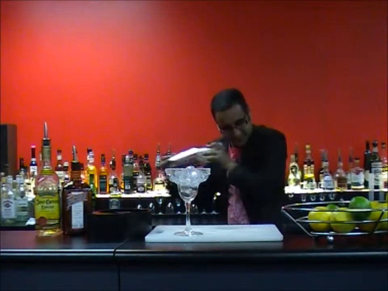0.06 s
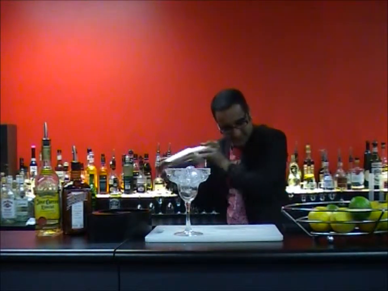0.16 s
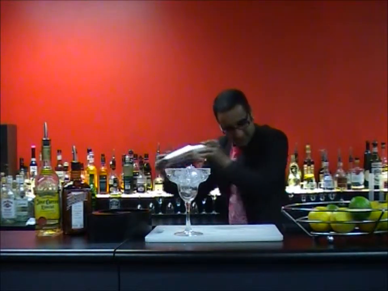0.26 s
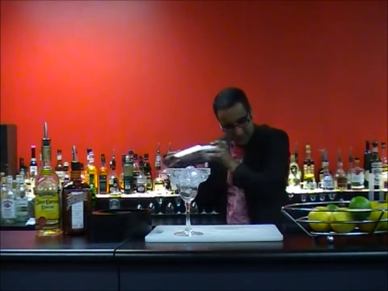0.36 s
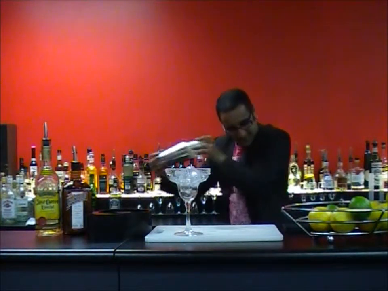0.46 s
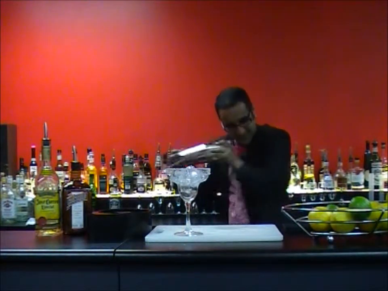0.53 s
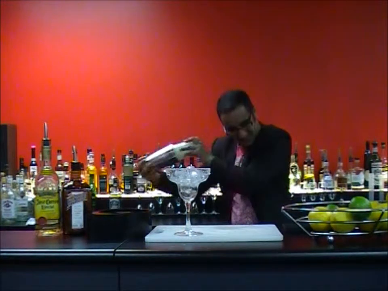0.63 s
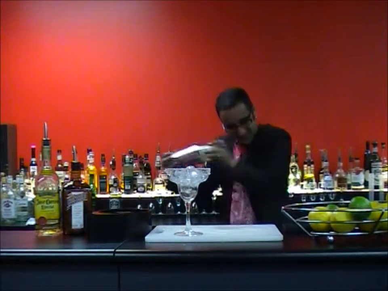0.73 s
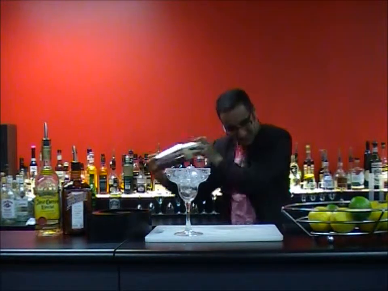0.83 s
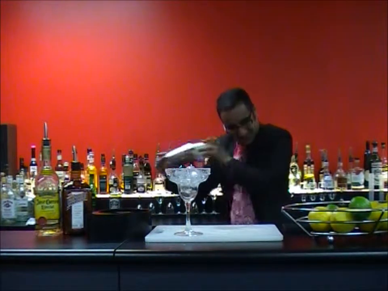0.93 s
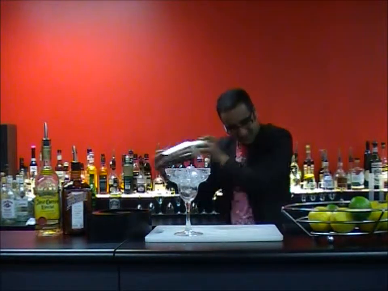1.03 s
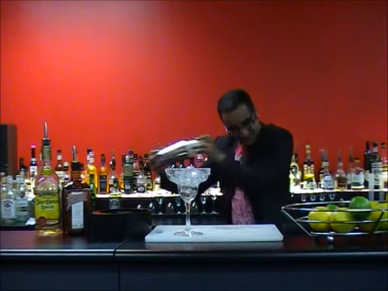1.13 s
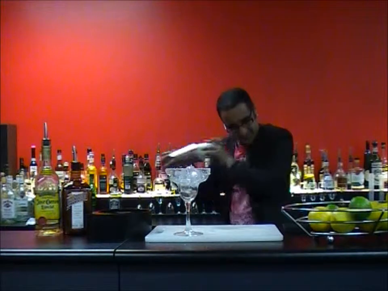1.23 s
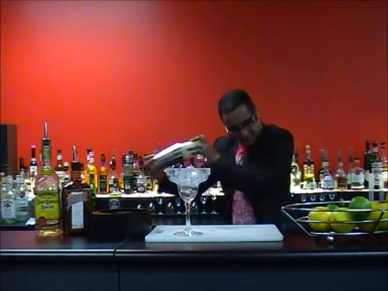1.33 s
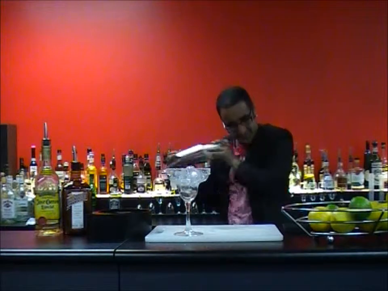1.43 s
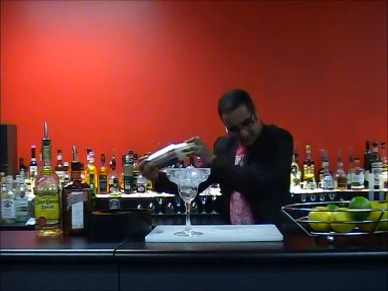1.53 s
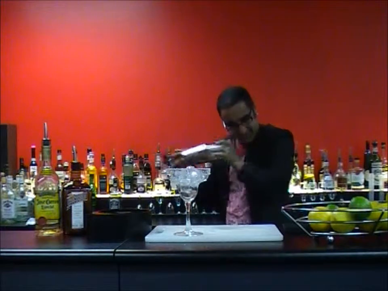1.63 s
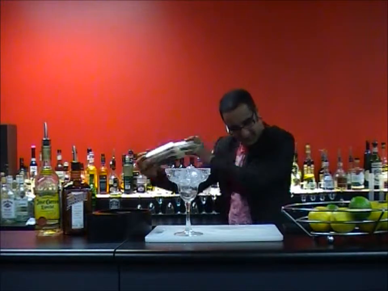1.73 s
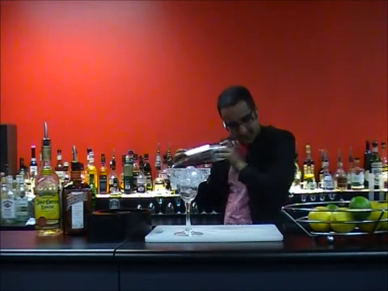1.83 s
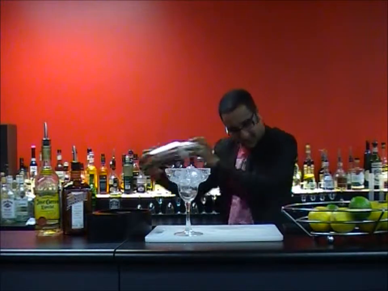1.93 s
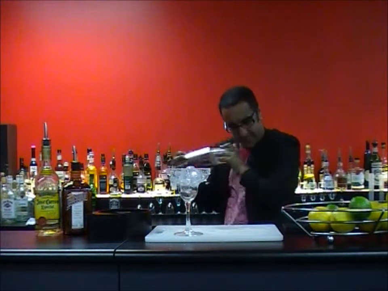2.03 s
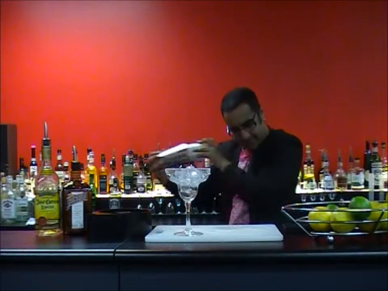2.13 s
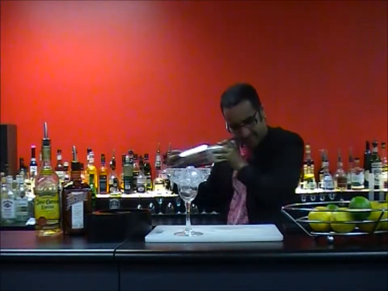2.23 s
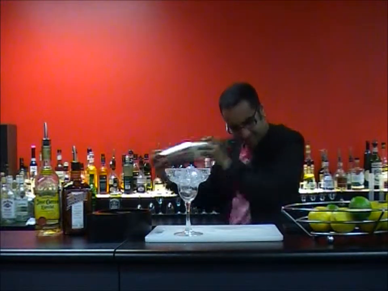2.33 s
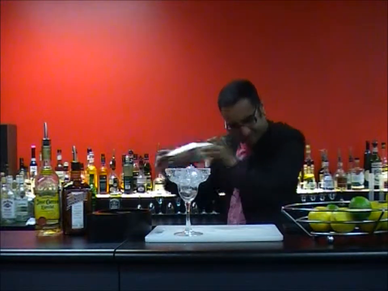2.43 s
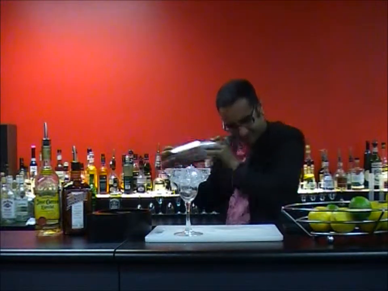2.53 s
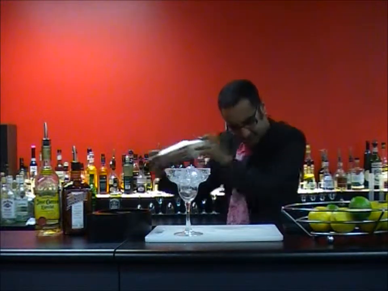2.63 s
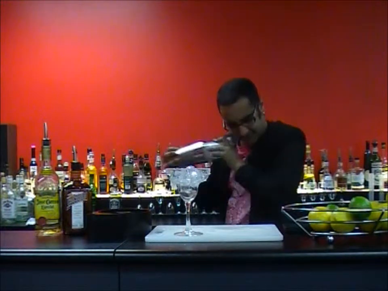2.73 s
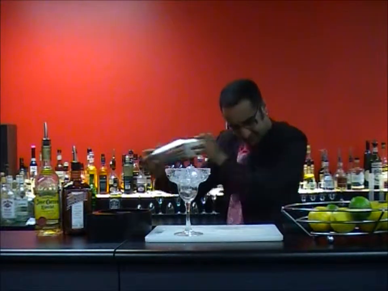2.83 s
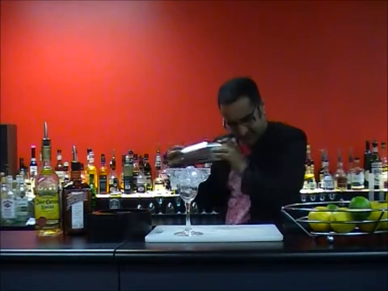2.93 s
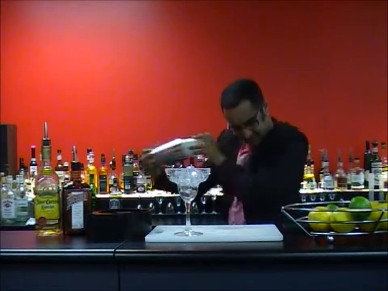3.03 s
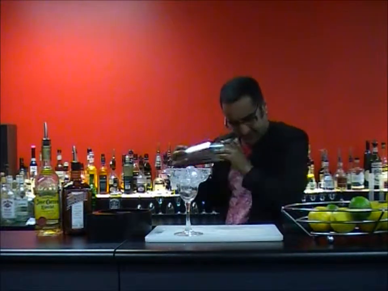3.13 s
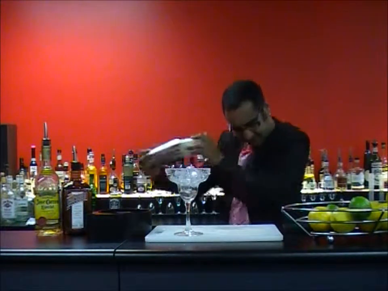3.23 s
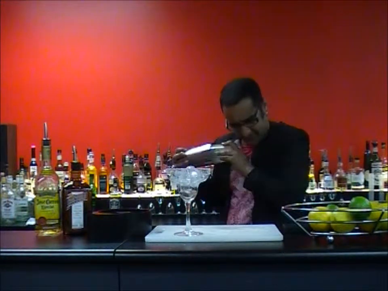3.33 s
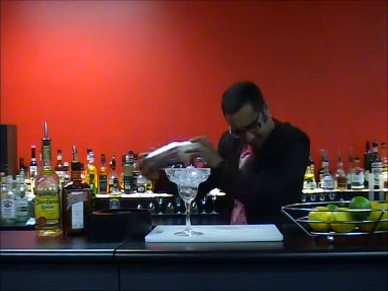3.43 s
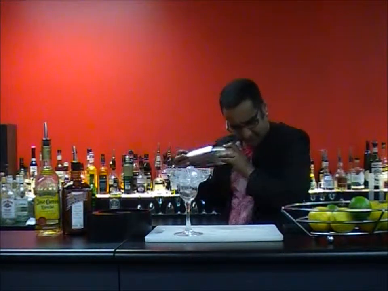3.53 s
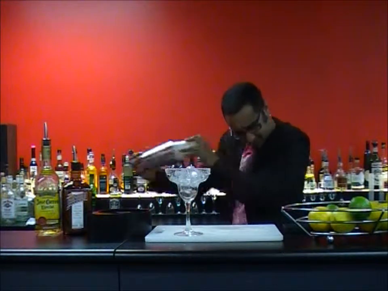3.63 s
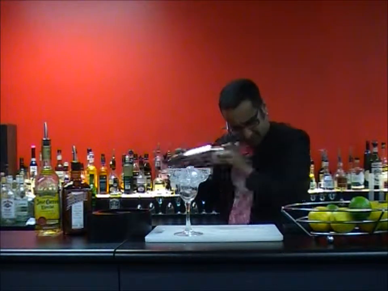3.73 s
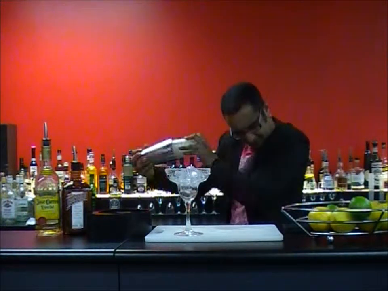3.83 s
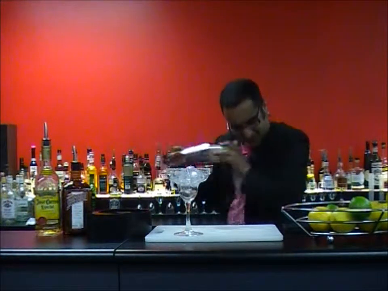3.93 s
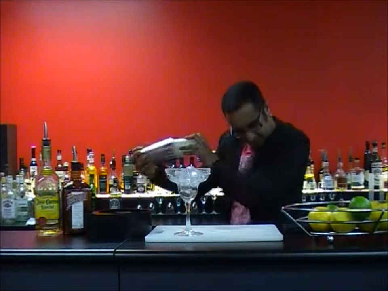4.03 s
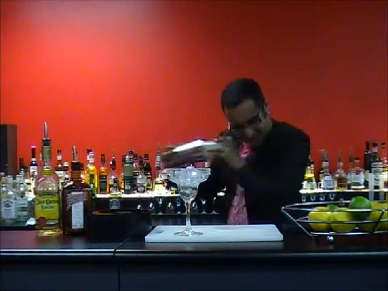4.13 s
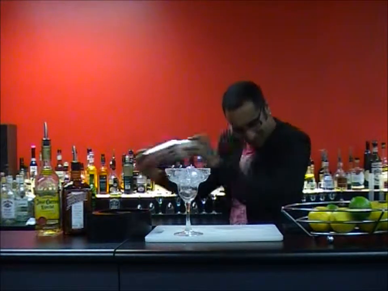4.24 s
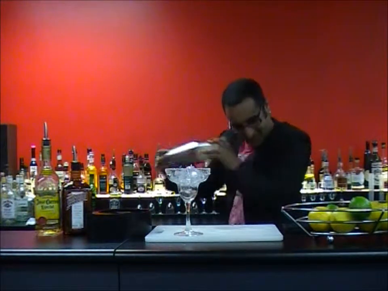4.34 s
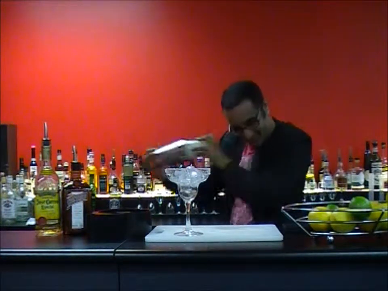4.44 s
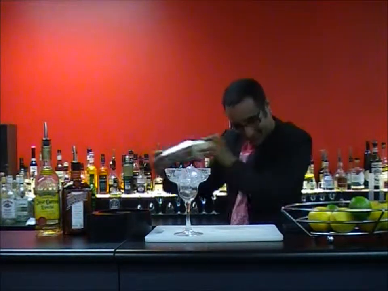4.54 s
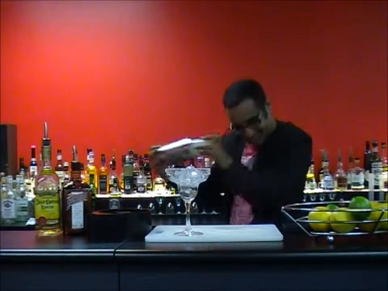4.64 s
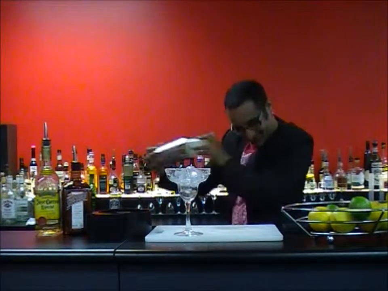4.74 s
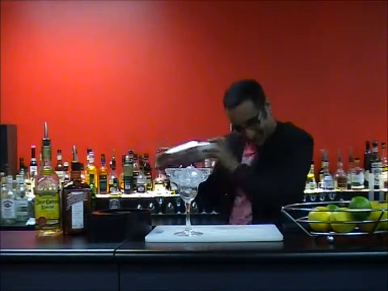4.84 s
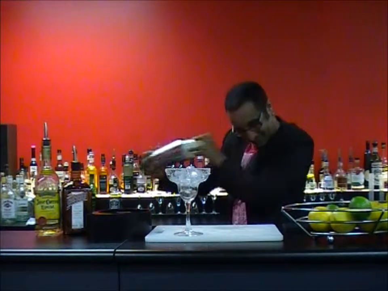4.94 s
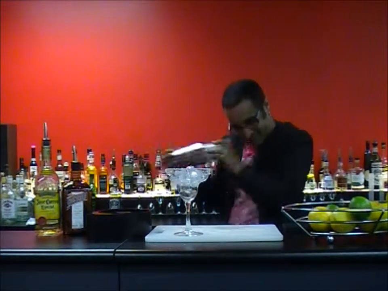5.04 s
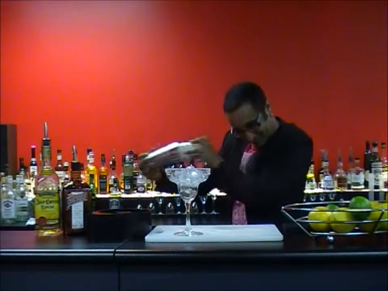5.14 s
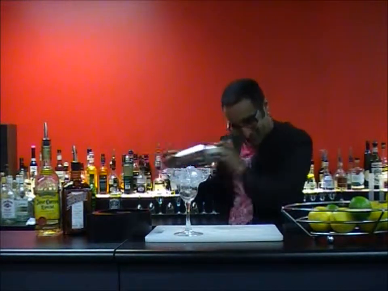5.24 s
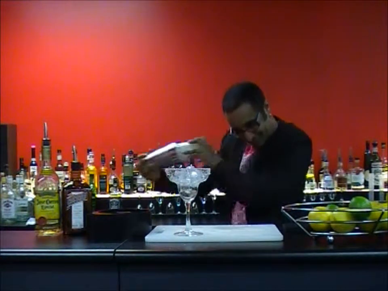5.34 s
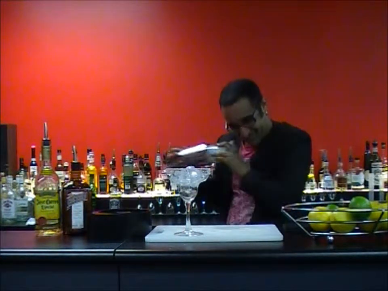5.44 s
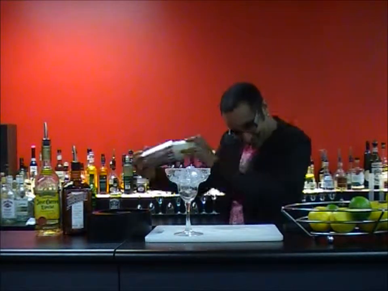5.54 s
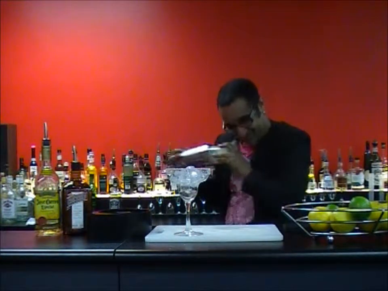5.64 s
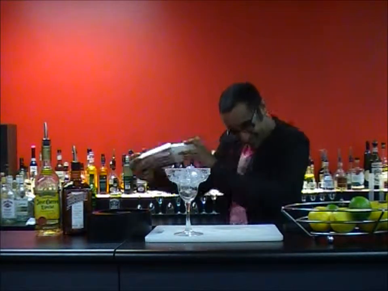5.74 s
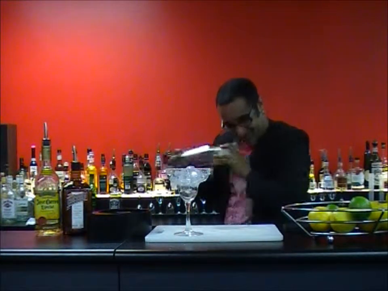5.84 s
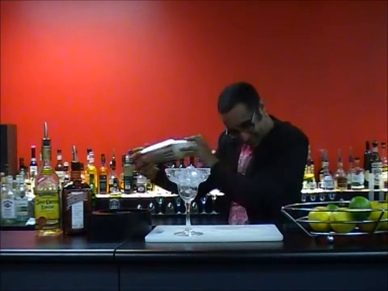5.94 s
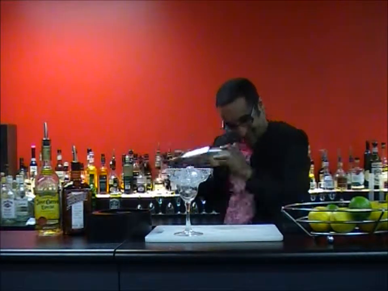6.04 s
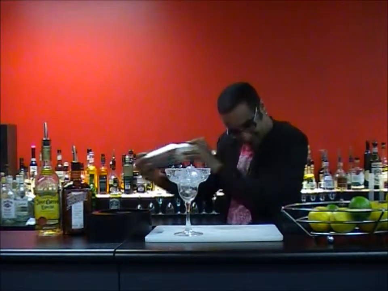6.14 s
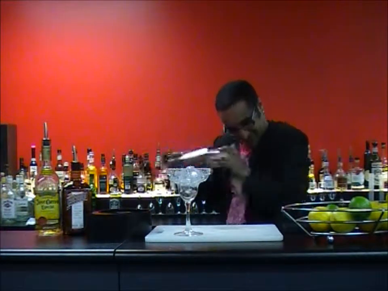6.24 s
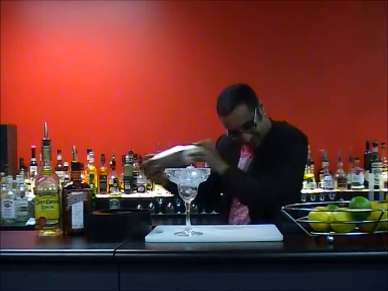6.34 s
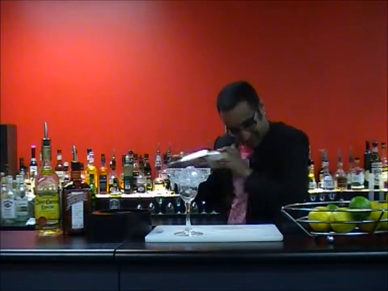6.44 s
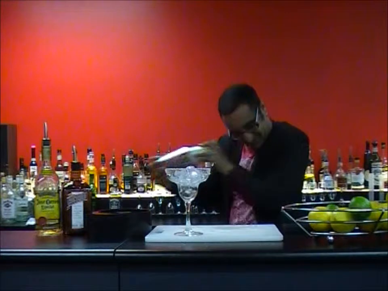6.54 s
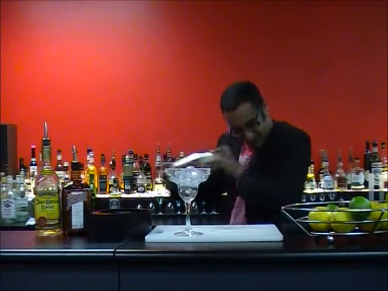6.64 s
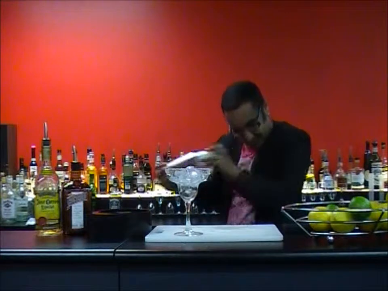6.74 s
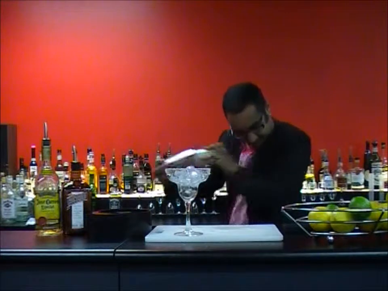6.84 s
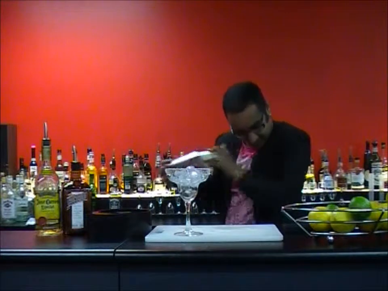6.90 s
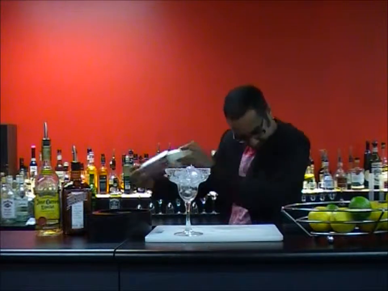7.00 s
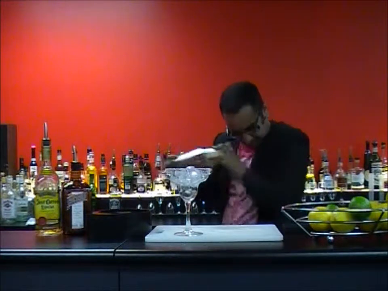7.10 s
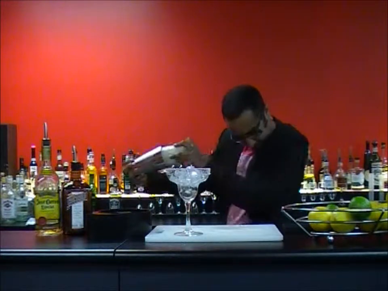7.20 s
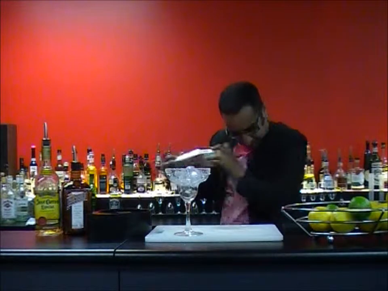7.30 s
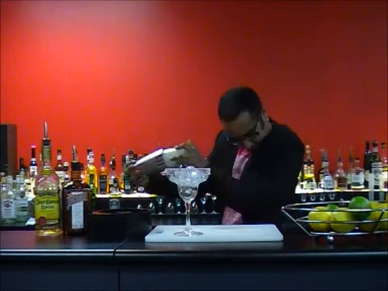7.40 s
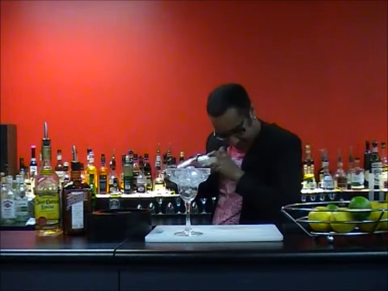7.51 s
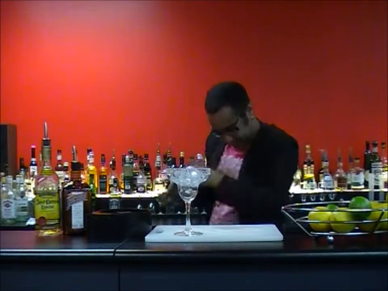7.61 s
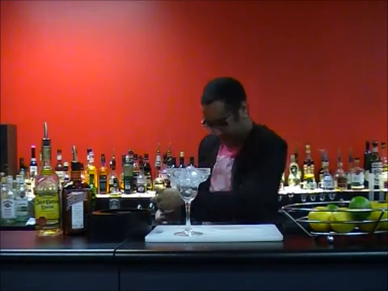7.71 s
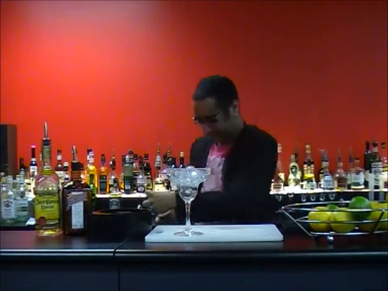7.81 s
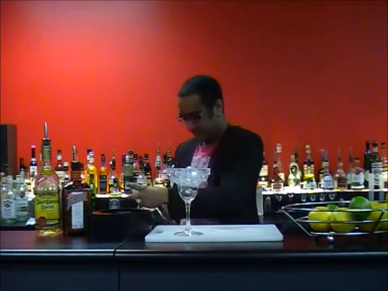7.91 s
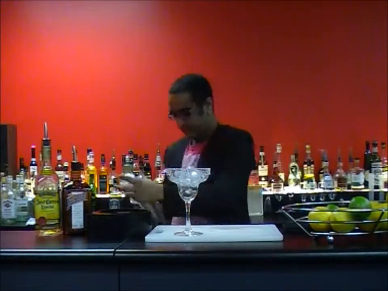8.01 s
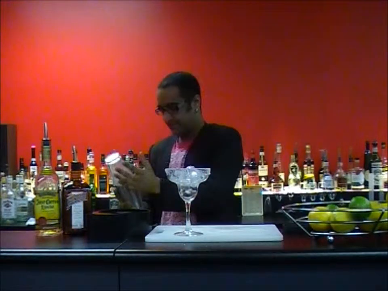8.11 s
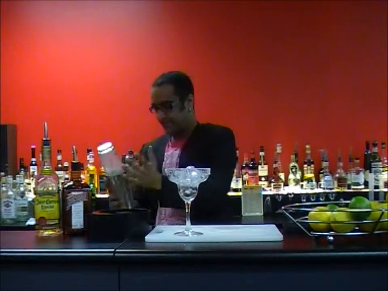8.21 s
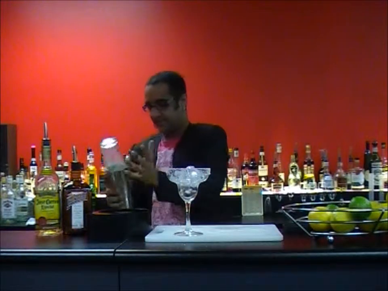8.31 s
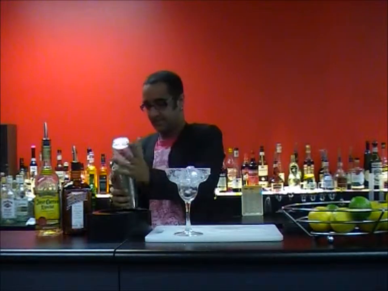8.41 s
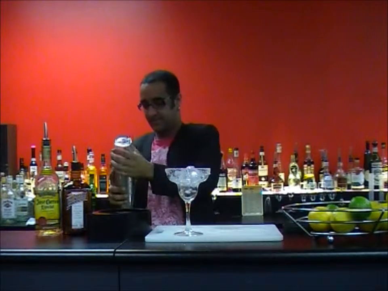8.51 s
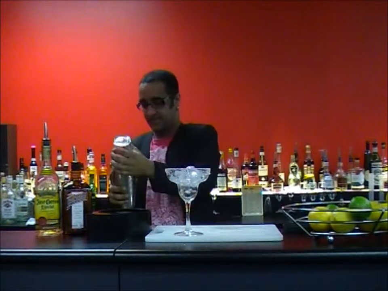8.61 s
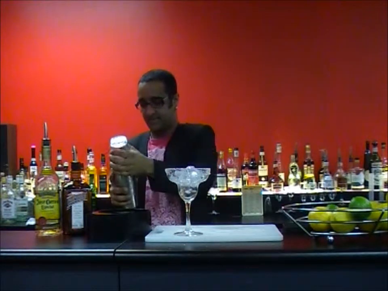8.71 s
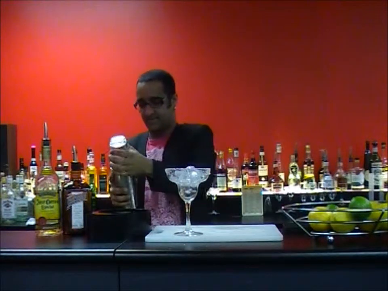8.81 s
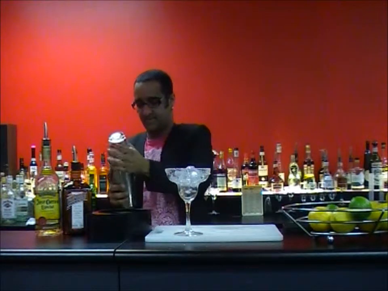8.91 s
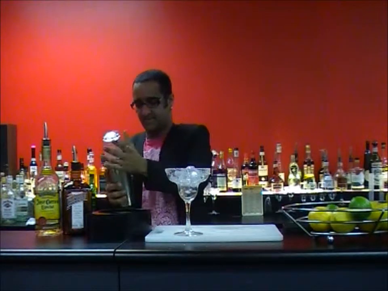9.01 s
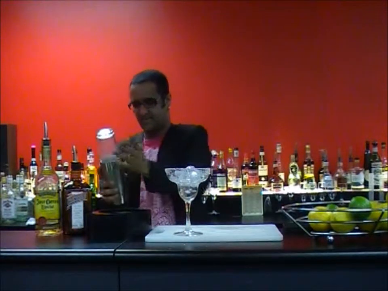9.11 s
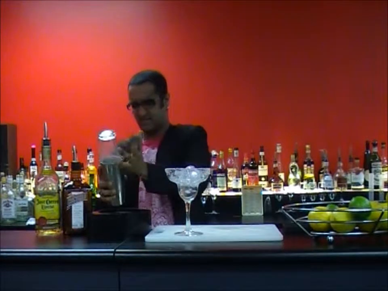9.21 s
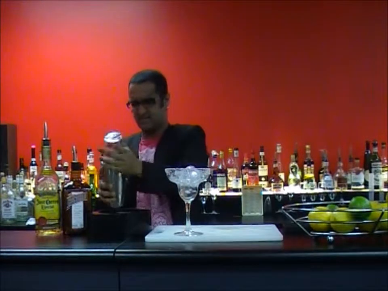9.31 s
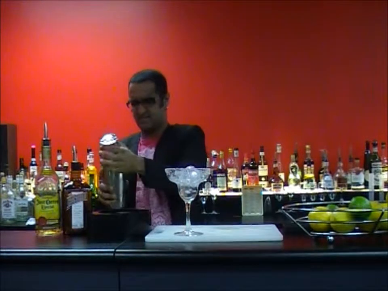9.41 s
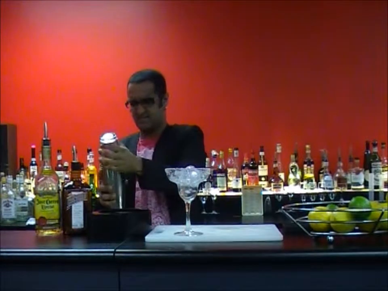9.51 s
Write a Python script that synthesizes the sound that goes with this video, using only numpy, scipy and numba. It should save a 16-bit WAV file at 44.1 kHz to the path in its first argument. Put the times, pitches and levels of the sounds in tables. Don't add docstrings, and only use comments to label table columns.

```python
import sys
import numpy as np
from scipy import signal
from scipy.fft import rfft, irfft, next_fast_len
from scipy.io import wavfile
from scipy.ndimage import uniform_filter1d
from numba import njit

SR = 44100
rng = np.random.default_rng(int(sys.argv[2]) if len(sys.argv) > 2 else 0)


def rack_gain(trim_db):
    fader = np.asarray(trim_db, float)
    return 10 ** (fader / 20)


def materialize(psi):
    bounded = np.clip(np.atleast_2d(psi).T, -1, 1)
    quanta = np.round(bounded * 32767).astype(np.int16)
    wavfile.write(sys.argv[1], SR, quanta)


N = 421576

# (time [s], level [dB])
TUMBLE = [(0.0, -10.5), (0.4, -9.5), (1.65, -13.5), (2.26, -7.5), (2.69, -12.5), (3.94, -14.5),
          (4.05, -12.5), (6.95, -11), (7.48, -12.5), (7.67, -25.5), (7.96, -17.5), (8.14, -40.5),
          (9.13, -34), (9.56, -33)]
# (time [s], bottom ring [dB], wall ring [dB], rebound [dB], wall patch [Hz])
OUTWARD = [(.047, -45, -20.5, -26, 3380), (0.479, -25, -21, -24, 3450), (0.903, -22, -21, -35, 3570),
           (1.342, -28, -21, -29, 3200), (1.76, -27, -22.5, -27, 2860), (2.188, -25, -26, -22.5, 2960),
           (2.623, -17, -20, -41, 2860), (3.057, -24, -24.5, -27, 2550), (3.454, -27, -23.5, -25.5, 3840),
           (3.884, -19.5, -20, -23, 3040), (4.298, -22, -22.5, -23, 2940), (4.72, -41, -19.5, -25, 3130),
           (5.131, -19.5, -19.5, -23.5, 3030), (5.569, -28, -24, -24, 3680), (5.977, -21, -19.5, -28, 3780),
           (6.395, -27, -18.5, -25, 3000), (6.814, -29, -20, -25.5, 4120), (7.228, -23, -23.5, -25, 2880)]
# (time [s], bottom ring [dB], wall ring [dB], rebound [dB], wall patch [Hz])
HOMEWARD = [(0.266, -20, -21.5, -33, 3200), (.67, -28, -24, -26.5, 3180), (1.12, -23, -25.5, -26.5, 3020),
            (1.555, -20.5, -21.5, -26, 3560), (1.998, -40, -19.5, -26, 2460), (2.411, -25, -23, -36, 3800),
            (2.828, -30, -25, -29, 3100), (3.263, -23, -23, -40.5, 2960), (3.668, -27.5, -23.5, -32, 3100),
            (4.084, -23, -20.5, -25, 3140), (4.519, -22.5, -19.5, -24, 2980),
            (4.932, -22.5, -20.5, -21.5, 3800), (5.344, -20.5, -19.5, -24, 2800),
            (5.777, -17.5, -22.5, -20.5, 3800), (6.198, -28, -19.5, -25.5, 3600),
            (6.6, -38, -20, -21.5, 3700), (7.023, -28, -22, -27.5, 2950),
            (7.436, -25.5, -19.5, -26.5, 3050)]
# (time [s], bottom ring [dB], wall ring [dB], chink [dB], rise [s])
SLIDES = [(2.2, -35, -25, -27.5, 0.048), (4.968, -22.5, -24.5, -28, 0.075), (6.67, -38, -25, -30, 0.039),
          (7.692, -32, -48, -31, .004), (7.882, -33, -35, -36, 0.017), (8.009, -34, -31.5, -38, 0.054),
          (8.381, -26, -28.5, -33.5, 0.047), (8.578, -36, -38, -44.5, 0.038), (8.745, -45, -44, -49, 0.022),
          (9.055, -56, -59, -60, .034), (9.235, -32, -35, -43, 0.04), (9.285, -39, -35, -37, 0.064),
          (9.517, -52, -42, -44.5, 0.014)]
# (time [s], level [dB])
SCUFFS = [(.422, -27), (.828, -30), (1.062, -26.5), (1.284, -26), (1.509, -34), (1.932, -41),
          (2.525, -22.5), (2.773, -25.5), (3.386, -30), (4.04, -24.5), (5.3, -24), (5.526, -24.5),
          (5.694, -43), (6.543, -24.5), (6.969, -30), (7.14, -27)]
# (frequency [Hz], level [dB])
MICROPHONE = [(300, -15), (700, -3.5), (1200, -1.5), (1900, -3), (3500, 0.5), (5500, 1), (7700, 2.5),
              (10000, -2.5), (12500, -14.5), (15500, -24)]
# (frequency [Hz], level [dB])
PORT_DIFFERENCE = [(250, 0.5), (1900, .5), (4000, 0.5), (8000, -2), (13000, 0)]
# (delay [s], level [dB])
ECHOES = [
    (.0068, -18.5),
    (.0093, -16),
    (.0145, -14),
    (.023, -27.5),
]
# (frequency [Hz], t60 [s])
BAR_T60 = [(300, 1), (1300, 0.62), (3500, 0.73), (9000, 0.52)]
# (frequency [Hz], level [dB])
SIDEWAYS = [(1500, -11.5), (4500, -5.5), (7000, -7.5), (9500, 4.5), (11500, 2.5), (13000, 2)]
# (frequency [Hz], density [dB per Hz])
ROOM_AIR = [(25, -32), (70, -26), (150, -15), (270, -8.5), (600, -9.5), (930, -14), (1730, -16.5),
            (2430, -24), (8000, -42), (11900, -55), (15000, -54)]
# (frequency [Hz], width [Hz], level [dB])
HUM = [(309, 5.3, -25.5), (450, 4.2, -29), (591, 7.8, -40)]
# (frequency [Hz], likeness [0 to 1])
COHERENCE = [(60, 0.49), (240, 0.91), (950, 0.89), (3770, 0.75), (15000, 0.48)]
# (frequency [Hz], level [dB])
MAINS = [(50.3, -53.5), (99.7, -54.5), (150, -56), (200.5, -51)]
# (time [s], level [dB])
HUM_LEVEL = [(0.0, -46), (0.88, -44.5), (1.3, -48), (2.29, -43), (2.98, -48), (3.9, -48.5), (5.14, -42),
             (5.67, -46.5), (5.9, -44), (7.53, -48.5), (7.75, -40), (8.31, -41.5), (8.39, -37.5),
             (8.79, -41.5), (9.1, -39), (9.56, -37)]
# (time [s], peak [dB], ring [Hz])
CHIPS = [(0.0473, -19, 7260), (0.062, -12, 7800), (0.2668, -10, 7180), (0.4783, -10, 7350),
         (0.4853, -10, 6850), (0.6005, -14, 7860), (0.6699, -3, 7490), (0.7128, -5, 8300),
         (0.8984, -9, 7190), (0.9154, -7, 8360), (0.9263, -6, 7320), (0.9467, -11, 7570),
         (1.1478, 1, 7700), (1.3414, -9, 7050), (1.3498, -9, 7280), (1.4581, -3, 7110),
         (1.5524, -7, 7320), (1.5698, -9, 7000), (1.71, -9, 7480), (1.7634, -8, 7900),
         (1.7823, -6, 7710), (1.7928, -3, 8050), (1.9465, -6, 8300), (1.9844, -5, 7940),
         (2.008, -7, 7760), (2.2074, -5, 7140), (2.3316, -7, 6340), (2.3875, -3, 8300),
         (2.4024, -2, 7610), (2.4232, -2, 8230), (2.537, -9, 7370), (2.5895, -7, 7500),
         (2.6224, -14, 8100), (2.6324, -9, 7800), (2.8255, -4, 8220), (2.8462, 1.5, 8250),
         (3.0505, -3, 7800), (3.0659, -12, 7650), (3.214, -4, 7830), (3.244, -2, 7540),
         (3.265, -9, 7700), (3.277, -13, 7700), (3.457, -5, 7380), (3.5987, -4, 7520),
         (3.79, -2, 7600),
         (4.0802, -19, 7470), (4.0937, -8, 8520), (4.1141, -1, 8810), (4.1191, 1, 7700),
              (4.2015, 0, 7450), (4.2932, -12, 7500), (4.321, -1, 6200), (4.4269, -12, 7640),
              (4.4786, -10, 7350), (4.503, -6, 10500), (4.5117, -2, 9250), (4.5207, -10, 7840),
              (4.539, 0, 6800), (4.609, -16, 7400), (4.7322, -10, 7700), (4.7545, -5, 6600),
              (4.8225, -9, 7370), (4.874, -1, 8060), (4.8983, -7, 7800), (4.9283, -3, 7790),
              (4.9362, -6, 9000), (5.0899, 1, 7530), (5.145, -5, 8300), (5.2969, -6, 7670),
              (5.3593, -9, 7790), (5.5304, -10, 7440), (5.6622, 1, 6330), (5.723, -5, 8270),
              (5.767, 6, 8160), (5.8706, -1, 7450), (5.8881, -13, 7750), (5.9679, -16, 9010),
              (5.9744, -5, 7720), (5.9849, -13, 7400), (6.113, 1, 8250), (6.193, -3, 7400),
              (6.3755, -10, 7370), (6.3877, 0, 8300), (6.3994, 0, 8070), (6.4318, -3, 7150),
              (6.5087, -7, 8000), (6.6045, -13, 7580), (6.6209, 2, 7620), (6.7676, -4, 8500),
              (6.814, 4, 7640), (6.8175, -6, 8400), (6.8365, -10, 8500), (6.9297, -13, 7540),
              (7.0265, 2, 8500), (7.1801, -11, 7750), (7.2265, 1, 9430), (7.4406, -15, 8500),
              (7.4475, -18, 6070), (7.46, -7, 6240),
         (3.2924, -16, 7400), (3.6894, -16, 7930), (5.9124, -4, 7450), (5.9964, -12, 7470),
               (6.2074, -10, 6400), (6.6264, -7, 7620), (6.641, -5, 7940), (6.8364, -12, 7840),
               (7.1714, -3, 7710)]
# (time [s], peak [dB], ring [Hz])
KNOCKS = [(0.062, 2, 3620), (0.2828, -7, 2290), (0.2887, -2, 3100), (0.4938, -3, 3100), (0.5067, 5, 3760),
          (0.6956, -11, 4000), (0.7198, -2, 3150), (0.9123, -9, 2860), (0.9283, 2, 2560),
          (1.3453, -4, 3000), (1.3628, 3, 3750), (1.3675, 5, 2840), (1.5559, -2, 2490), (1.5738, 4, 3540),
          (1.8163, 2, 2820), (2.0075, 2, 2530), (2.6493, 2, 2700), (2.8476, 3.5, 3090), (3.05, -12, 3040),
          (3.0662, 0, 3250), (3.264, -3, 2810), (3.275, -6, 2920), (3.3528, -1, 2780), (3.471, 2.5, 2940),
          (3.4755, -14, 4000), (3.8871, -5, 3050), (3.8975, -12, 2970), (4.0976, -5, 3200),
          (4.1177, 2, 3940), (4.3066, -12, 3160), (4.4268, -4, 4070), (4.5281, 5.5, 2780),
          (4.7217, -18, 3300), (4.7381, -15, 3690), (4.9374, 5.5, 3840), (4.9701, 1, 3740),
          (5.1352, -2, 3040), (5.1447, -5, 3060), (5.3438, -19, 3130), (5.5927, -4, 5200),
          (5.7882, -11, 5240), (5.8027, 4, 2960), (5.9848, -10, 2880), (6.208, 6.5, 2780),
          (6.2153, 7, 3830), (6.3999, -12, 3320), (6.428, -1, 3900), (6.6128, -12, 4050),
          (6.8354, -4, 3800), (6.8403, 0, 4650), (7.0264, -11, 3340), (7.2335, -16, 3880),
          (7.2459, -13, 2400), (7.441, 4, 2870), (7.449, 4, 2700)]
# (time [s], peak [dB], ring [Hz], chink above the ring [dB])
THUDS = [(.0625, 6, 2110, -6), (0.2835, 7.5, 1810, 5), (.714, 2, 2270, 4), (0.9298, 4.5, 1850, -4),
         (1.1487, 4, 2080, 7), (1.5755, 5.5, 1990, -9), (2.0089, 8.5, 2240, 5), (2.43, 7.5, 2050, -9),
         (2.5975, 4, 1980, 6), (2.6504, 8, 2210, 2), (2.8491, 6.5, 2090, -5), (2.8598, 5, 1980, 8),
         (3.07, 8.5, 2130, -3), (3.2445, -2, 1830, 4), (3.4717, 5.5, 2000, 1), (3.6873, 2.5, 2250, -3),
         (3.8986, 5.5, 1950, -10), (4.3225, 8, 2100, 0), (4.5133, 0, 2020, 17), (4.7387, 5.5, 2600, 11),
         (4.7567, 7, 1970, 14), (4.9381, 8.5, 2040, -2), (5.3787, 9, 2200, -2), (5.5758, -2, 1860, -21),
         (6.4265, 7.5, 2060, -8), (6.51, -2, 1900, -11), (6.6047, 7, 1830, 2), (7.2474, 11, 2250, -5),
         (7.2485, 3, 1870, -13)]
# (time [s], peak [dB], ring [Hz], chink above the ring [dB])
TICKS = [(0.5006, 8, 3650, 8), (.6017, -9, 3060, 14), (0.697, 3.5, 4120, 7), (0.952, -1, 3040, -10),
         (1.364, -7, 3630, 2), (1.794, -2, 2520, -5), (1.948, -1, 3800, 32), (2.4238, 7.5, 3960, 15),
         (2.538, 1, 3980, 23), (2.8469, -10, 3970, 2), (2.85, 2, 3120, 2), (2.855, -4, 3180, -8),
         (4.201, -9, 3250, 1), (5.1453, 10.5, 2950, 11), (5.532, -3.5, 4090, -15), (5.7683, -15, 3060, -2),
         (5.9854, 4, 3100, 5), (6.2171, 0.5, 3920, -24), (6.8146, -3, 3100, 14), (6.836, -6, 4040, -16),
         (7.0258, 5, 3120, 13), (7.181, 9.5, 3130, 17), (7.441, -11, 2270, -15), (7.4583, -13, 3220, -17),
         (7.464, 4, 2670, 16)]
# (time [s], peak [dB], ring [Hz], chink above the ring [dB])
OPENING = [
    (8.381, -11, 2530, 15),
    (8.386, -9, 1900, -15),
    (8.398, -3, 2360, -5),
    (8.7476, -12, 1210, 16),
    (9.0797, -21, 4090, 6),
    (9.237, -14, 1320, -14),
    (9.257, -8, 2300, 7),
    (9.2467, -7, 1990, 12),
    (9.2851, -11, 1600, 13),
    (9.365, -10, 4820, 15),
]
# (delay [s], level [dB])
BOUNCES = [
    (0, 2.5),
    (.0011, -16),
    (.0024, -12),
]
# (time [s], length [s], frequency [Hz], level [dB])
SKIDS = [(0.073, 0.1, 3800, -21), (2.005, 0.046, 2420, -18), (4.937, .14, 3830, -19),
         (4.99, 0.11, 1850, -28), (6.4, 0.027, 1840, -27), (6.42, 0.076, 2130, -20),
         (5.878, 0.058, 3940, -22.5), (7.25, 0.044, 2000, -26), (7.452, .07, 3050, -29),
         (8.4, .05, 2600, -30), (9.28, .08, 3200, -38)]
# (time [s], jolt peak [dB], duck [dB])
JOLTS = [(0.283, -44, -2.5), (0.927, -42, -5), (1.148, -36, -6), (1.572, -45, -5), (2.008, -48, -1.5),
         (2.427, -49, -2), (2.649, -43, -3), (2.852, -57, -4), (3.279, -38, -1.5), (4.734, -37, -1.5),
         (4.939, -38, -2), (5.144, -39, -9.5), (5.378, -37, -1.5), (5.985, -37, -3.5)]
# (time [s], peak [dB], frequency [Hz])
THUMPS = [
    (8.387, -31, 466),
    (9.6, -36, 226),
    (9.245, -29, 156),
]

# (lowest [Hz], highest [Hz], t60 [s], level [dB])
SLOSH, BOTTOM = (469.5, 1601, 0.18, -9), (1743, 2058, 0.019, 0.16)
WALL, CHINK = (2330, 4390, 0.0042, 1.13), (4430, 13900, 0.0085, 1.57)
BOTTOM_HZ, CHINK_HZ, SLIDE_HZ = 1892, 7700, 2850
PILE_S, REBOUND_S, SCUFF_S = 0.038, 0.035, 0.024
REBOUND_AT = 0.502
CHINK_DB, CHINK_FOLLOWS = -25.5, 0.64
REBOUND_BOTTOM_DB, REBOUND_WALL_DB, REBOUND_CHINK_DB = -1.5, -7.5, -3
SCUFF_WALL_DB, SCUFF_CHINK_DB = -4.5, -2.5
WALL_LAG_S = 0.0081
UPRIGHT_S, UPRIGHT_SLOSH_DB = 8.3, -5
WHINE_HZ, WHINE_DB = 326, -36
DUCK_HOLD_S, DUCK_BACK_S = 0.06, 0.01


def evened(x):
    return x / np.sqrt(np.mean(x ** 2) + 1e-20)


def read(points, hz):
    f, value = np.transpose(points)
    return np.interp(np.log(hz + 1), np.log(f + 1), value)


def curve(rows):
    s, value = np.transpose(rows)
    return np.interp(np.arange(N) / SR, s, value)


def add(mix, s, sound):
    part = mix[max(round(s * SR), 0):][:len(sound)]
    part += sound[:len(part)]


def colour(x, points, sign=1):
    hz = np.fft.rfftfreq(512, 1 / SR)
    gain = rack_gain(sign * read(points, hz))
    taps = np.roll(irfft(gain), 256) * np.hanning(512)
    return signal.oaconvolve(x, taps, "same")


def throws():
    s, bottom_db, wall_db, rebound_db, _ = np.transpose(sorted(OUTWARD + HOMEWARD))
    gap = np.append(np.diff(s), np.diff(s).mean())
    one = np.ones(len(s))
    chink_db = CHINK_DB + CHINK_FOLLOWS * (wall_db - wall_db.mean())
    piles = [s, bottom_db, wall_db, chink_db, PILE_S * one]
    rebounds = [s + REBOUND_AT * gap, rebound_db + REBOUND_BOTTOM_DB, rebound_db + REBOUND_WALL_DB,
                rebound_db + REBOUND_CHINK_DB, REBOUND_S * one]
    scuffs = [(s, db, db + SCUFF_WALL_DB, db + SCUFF_CHINK_DB, SCUFF_S) for s, db in SCUFFS]
    return np.vstack([np.transpose(piles), np.transpose(rebounds), scuffs, SLIDES])


def patch_hz():
    strokes = [(row[0], row[-1]) for row in OUTWARD + HOMEWARD]
    s, hz = np.transpose(sorted(strokes + [(SLIDES[3][0], SLIDE_HZ)]))
    return hz[np.maximum(np.searchsorted(s, np.arange(N) / SR) - 1, 0)]


@njit
def ring_all(at, size, step, keep):
    out = np.zeros(N)
    for k in range(len(at)):
        z, turn = size[k] + 0j, keep[k] * np.exp(1j * step[k])
        for n in range(at[k], min(N, at[k] + int(-7 / np.log(keep[k])))):
            out[n] += z.imag
            z *= turn
    return out


def grains(family, strength, per_s, spread_db, favoured_hz=None, share=0.25):
    low_hz, high_hz, t60, db = family
    chance = rng.random(N)
    at = np.flatnonzero(chance < per_s / SR)
    large, place, short = rng.random((N // 8, 3))[:len(at)].T
    hz = low_hz * (high_hz / low_hz) ** place
    if favoured_hz is not None:
        near = chance[at] < share * per_s / SR
        hz = np.where(near, favoured_hz[at] * (1 + 0.09 * (place - 0.5)), hz)
    ring_s = t60 * (0.12 + 1.44 * short ** 2)
    size = rack_gain(spread_db * np.minimum(-np.log(large + 1e-9), 4)) / np.sqrt(ring_s * SR)
    size *= rack_gain(db) * 4.92 / np.sqrt(np.mean(size ** 2 * ring_s * SR) * len(at) / N)
    return ring_all(at, size * strength[at], 2 * np.pi * hz / SR, rack_gain(-60 / (ring_s * SR)))


def rattle():
    power = np.zeros((3, N)) + rack_gain(2 * (curve(TUMBLE) + [[-12], [-12], [-17]]))
    for s, *levels_db, rise in throws():
        u = np.arange(SR // 4) / SR / (0.66 * max(rise, 0.004))
        swarm = u ** 0.39 * np.exp(1.05 - 1.113 * u)
        for row, level_db, lag in zip(power, levels_db, (0, WALL_LAG_S, 0)):
            add(row, s + lag + 0.0013, rack_gain(2 * (level_db + 3.5)) * swarm)
    bottom, wall, chink = np.sqrt(power)
    steel = grains(BOTTOM, bottom, 1100, 3.36, np.full(N, BOTTOM_HZ), 0.5)
    steel += grains(WALL, wall, 1500, 1.93, patch_hz(), 0.36)
    steel += grains(CHINK, chink, 4000, 2.0, np.full(N, CHINK_HZ), 0.16)
    thin_steel = signal.butter(6, 1480, "high", fs=SR, output="sos")
    steel = signal.sosfilt(thin_steel, steel)
    stilled = rack_gain(curve([(UPRIGHT_S - 0.3, 0), (UPRIGHT_S, UPRIGHT_SLOSH_DB)]))
    return steel / ducks() ** 0.81 + grains(SLOSH, bottom * stilled, 1500, 3.4)


def reply():
    size = 2 * SR // 3
    taps = np.zeros((2, size))
    at = np.arange(400, size - 20, 20)
    at = at + rng.integers(0, 20, (2, len(at)))
    np.put_along_axis(taps, at, rng.choice([-1., 1.], at.shape), 1)
    hz, t, z = signal.stft(taps, SR, nperseg=256)
    decay = rack_gain(-60 * t / read(BAR_T60, hz)[:, None])
    both, apart = signal.istft(z * decay, SR, nperseg=256)[1]
    tail = both + np.outer([1, -1], colour(apart, SIDEWAYS))
    tail *= rack_gain(-6.0) / np.linalg.norm(both)
    for k, (s, db) in enumerate(ECHOES):
        n = round((s + rng.uniform(-0.0004, 0.0004)) * SR)
        tail[:, n] += rack_gain(db + np.array([1.5, -1.5]) * (-1) ** k)
    return tail


def bar(x, count=6, moves_per_s=14.):
    place = moves_per_s * np.arange(N) / SR
    size = next_fast_len(N + SR)
    shares = [np.cos(np.pi / 2 * np.clip((place - k) % count - 1, -1, 1)) for k in range(count)]
    spectrum = sum(rfft(x * w, size) * rfft(reply(), size) for w in shares)
    return x + irfft(spectrum, size)[:, :N]


def cooler():
    frames, hz = N // 2048 + 5, np.fft.rfftfreq(8192, 1 / SR)
    a, b, c, d, patches = rng.standard_normal((frames, 4097, 5)).T
    tones = sum(rack_gain(2 * db) / (w + (hz - f) ** 4 / w ** 3) for f, w, db in HUM)
    air = rack_gain(2 * (read(ROOM_AIR, hz) - 24.5))
    slow = uniform_filter1d(uniform_filter1d(patches, 60, 0), 3, 1)
    patches = rack_gain(1.6 * evened(slow))
    same = np.clip(read(COHERENCE, hz), -1, 1)[:, None]
    left = a + 1j * b
    right = same * left + np.sqrt(1 - same ** 2) * (c + 1j * d)
    z = np.array([left, right]) * np.sqrt(air + tones)[:, None] * patches
    noise = signal.istft(z, nperseg=8192, noverlap=6144)[1][:, 4096:N + 4096]
    return rack_gain(-31.0) * evened(noise)


def whine():
    waver = evened(uniform_filter1d(uniform_filter1d(rng.standard_normal(N), 2500), 2500))
    tone = np.sin(2 * np.pi * np.cumsum(WHINE_HZ + 1.38 * waver) / SR)
    buzz = np.zeros((2, N))
    for hz, db in MAINS:
        turns = hz * np.arange(N) / SR + rng.random() + np.array([[0], [0.07]])
        buzz += rack_gain(db) * np.sin(2 * np.pi * turns)
    return np.sqrt(2) * (rack_gain(WHINE_DB + np.array([[0.7], [-0.7]])) * tone + buzz)


def slow_gain():
    return rack_gain(uniform_filter1d(curve(HUM_LEVEL), 800) + 34.5)


def ring(hz, t60):
    t = np.arange(SR // 30) / SR
    return rack_gain(-60 * t / t60) * np.sin(2 * np.pi * hz * t) * np.minimum(t / 0.00029, 1)


def chips():
    out = np.zeros(N)
    for s, db, hz in CHIPS:
        tick = ring(hz, 0.0038) + 0.67 * ring(1.1 * hz, 0.007)
        tick += 0.12 * ring(1.6 * hz, 0.0029) + 0.21 * ring(0.65 * hz, 0.002)
        add(out, s + 0.0005, rack_gain(db - 5.5) * tick)
    for s, db, hz in KNOCKS:
        knock = ring(hz, 0.026) + 0.42 * ring(1.15 * hz, 0.0074) + 0.16 * ring(2.2 * hz, 0.0025)
        add(out, s + 0.0006, rack_gain(db - 11.5) * knock)
    return out


def clacks():
    out = np.zeros(N)
    for (s, db, hz, chink_db), (a, b, c) in zip(THUDS + TICKS + OPENING, rng.random((99, 3))):
        body = ring(hz, 0.013) + 0.75 * ring(hz * (0.89 + 1.23 * a), 0.0022)
        chink = ring(7000 + 1800 * b, 0.0023) + 0.35 * ring(13200, 0.005)
        chink += 0.56 * ring(9500 + 3500 * c, 0.0034)
        clack = (body + rack_gain(chink_db) * chink) / (1.32 + 1.2 * rack_gain(chink_db))
        for lag, bounce_db in BOUNCES:
            add(out, s + lag, rack_gain(db + bounce_db - 2.1) * clack)
    return out


def skids():
    strength, out = np.zeros((len(SKIDS), N)), np.zeros(N)
    for row, (s, length, hz, db) in zip(strength, SKIDS):
        u = np.linspace(0, 1, round(max(length, 0.01) * SR))
        swell = np.sqrt(np.sin(np.pi * u ** 0.56).clip(0))
        add(row, s, rack_gain(db) * swell)
        out += grains((0.97 * hz, 1.03 * hz, 0.03, 0.1), row, 700, 2.5)
    return out


def jolts():
    out = np.zeros(N)
    for s, db, _ in JOLTS:
        add(out, s - 0.002, rack_gain(db + 1.5) * np.hanning(round(0.0047 * SR)))
    return out


def ducks():
    out, t = np.zeros(N), np.arange(SR // 3) / SR
    shape = np.minimum(t / 0.002, 1) * np.exp(-np.maximum(t - DUCK_HOLD_S, 0) / DUCK_BACK_S)
    for s, _, db in JOLTS:
        add(out, s + 0.0037, min(db, 0) * shape)
    return rack_gain(out)


def thumps():
    out, t = np.zeros(N), np.arange(SR // 8) / SR
    for s, db, hz in THUMPS:
        decay = rack_gain(db - 60 * t / 0.08)
        add(out, s, decay * np.sin(2 * np.pi * hz * t) * np.minimum(t / 0.0035, 1))
    return out


def scene():
    steel = rack_gain(-1.0) * rattle() + clacks() + chips() + skids()
    shaker = colour(steel / slow_gain(), MICROPHONE)
    small_body = signal.butter(2, 380, "high", fs=SR, output="sos")
    shaker = signal.sosfilt(small_body, shaker)
    return bar(shaker + thumps() / slow_gain()) + cooler() + whine()


def top_cut(x):
    return signal.sosfilt(signal.butter(12, 15850, fs=SR, output="sos"), x)


def record(dry):
    ports = np.array([colour(x, PORT_DIFFERENCE, sign) for x, sign in zip(dry, (0.5, -0.5))])
    ports = ports * slow_gain() * ducks()
    peak_db = 20 * np.log10(abs(ports).max(0) + 1e-9)
    fall = np.arange(N) * 13.3 / SR
    over_db = np.maximum(np.maximum.accumulate(peak_db + fall) - fall + 1.5, 0)
    late = np.roll(uniform_filter1d(over_db, 40), 50)
    held = ports / rack_gain(0.53 * late) + jolts()
    held = held / (1 + abs(held) ** 4) ** 0.25
    held = signal.oaconvolve(held, signal.firwin(255, 16000, fs=SR)[None], "same")
    return top_cut(held)


dry = scene()
out = record(dry)
materialize(out)
```